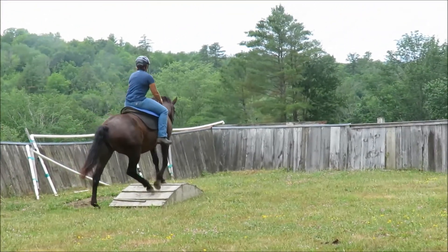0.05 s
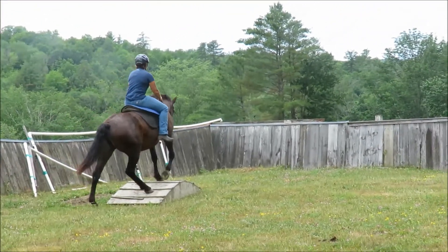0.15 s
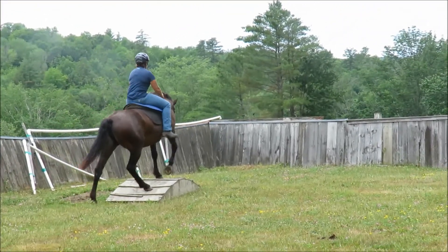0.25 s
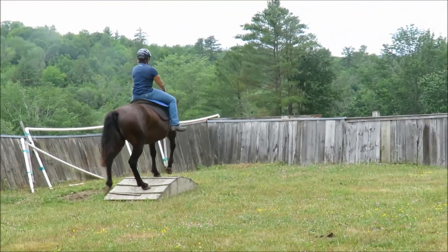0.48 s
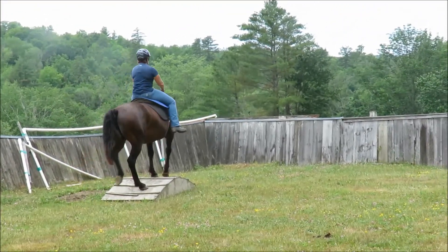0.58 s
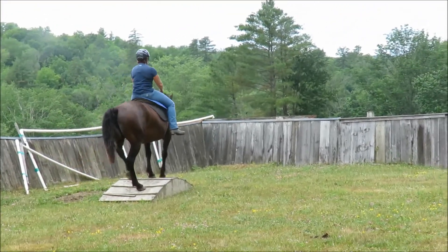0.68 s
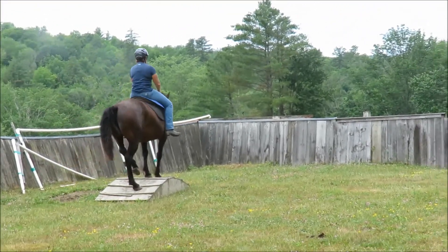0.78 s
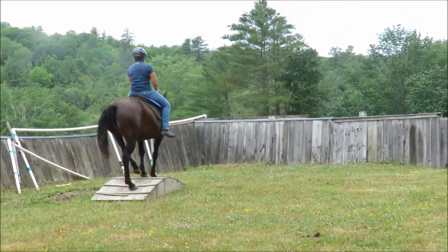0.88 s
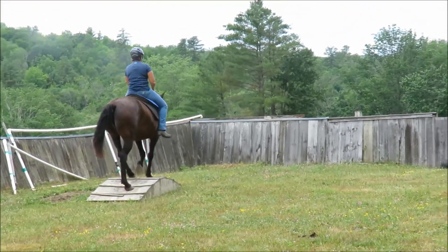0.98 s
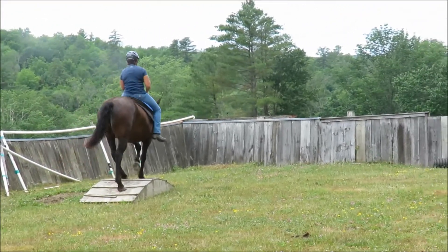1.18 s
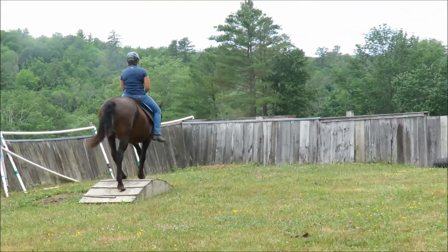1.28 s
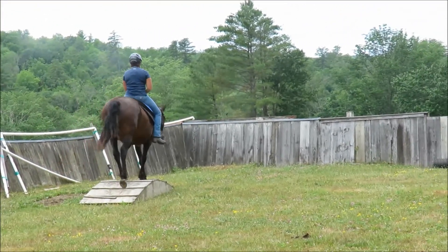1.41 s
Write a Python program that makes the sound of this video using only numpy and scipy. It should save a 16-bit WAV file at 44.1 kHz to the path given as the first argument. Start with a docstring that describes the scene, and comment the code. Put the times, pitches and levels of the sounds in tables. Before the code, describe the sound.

Hollow clops of a horse stepping onto wooden planks outdoors, with a faint distant bird.

```python
"""Horse on a wooden platform

In a paddock, some metres from the microphone, a horse steps onto a hollow wooden platform.
Each hoof lands toe first, then heel: the box booms, the hoof clops and the planks chatter; knocks and
scuffs follow as its weight shifts. Fence and trees echo faintly over a light breeze and a far bird."""
import sys
import numpy as np
from scipy import signal
from scipy.fft import rfft, irfft
from scipy.io import wavfile
from scipy.ndimage import uniform_filter1d

SR = 44100
rng = np.random.default_rng(int(sys.argv[2]) if len(sys.argv) > 2 else 0)


def generate_wav(signal):
    """Clip the signal to [-1, 1] and save it as 16-bit WAV at the path in sys.argv[1]."""
    frames = np.transpose(np.atleast_2d(signal))
    scaled = np.clip(frames, -1, 1) * 32767
    pcm = np.round(scaled).astype(np.int16)
    wavfile.write(sys.argv[1], SR, pcm)


N = 63945

# modes of the hollow platform (frequency [Hz], level on the ramp [dB], level on top [dB], t60 [s])
PLATFORM_MODES = [(60.3, -26.5, -21, 0.3), (145.2, -10.5, -9, 0.12), (174, -25.5, -7.5, 0.22),
                  (204.7, -2, -12, 0.23), (253.3, 5.5, -12.5, 0.087), (287.3, -6.5, -5, .19),
                  (333.7, -2.5, -12.5, 0.19), (364.3, -1, -1.5, 0.11), (440.7, -7, -7.5, 0.15),
                  (496, -17.5, -2, 0.17), (562.2, -12.5, -4.5, 0.18), (704, -20, -3, 0.09),
                  (746, -33, -4.5, .12)]


def undb(db):
    """Decibels to gain."""
    return 10 ** (np.asarray(db) / 20)


def unit(x):
    """Scale to an rms of 1."""
    return x / np.sqrt(np.mean(x ** 2) + 1e-20)


def clock():
    """Time in seconds."""
    return np.arange(N) / SR


def fade(t60):
    """Exponential decay, 60 dB down after t60 seconds."""
    return np.exp(-np.log(1000) * clock() / t60)


def arch(start, length):
    """Half a sine, silent before and after."""
    return np.sin(np.pi * np.clip((clock() - start) / length, 0, 1))


def gains(colour, size):
    """Gain of each frequency bin from (Hz, dB) points."""
    hz, db = np.array(colour).T
    return undb(np.interp(np.log(np.fft.rfftfreq(size, 1 / SR) + 1), np.log(hz), db))


def noise(colour):
    """Coloured noise of rms 1."""
    return unit(irfft(rfft(rng.standard_normal(N)) * gains(colour, N), N))


def snap(colour):
    """Shortest causal pulse with the given colour, peak 1."""
    cepstrum = irfft(np.log(gains(colour, 2 * N)))[:N]
    cepstrum[0] /= 2
    pulse = irfft(np.exp(rfft(2 * cepstrum, 2 * N)))[:N]
    return pulse / np.abs(pulse).max()


def conv(x, response):
    """Pass x through a response."""
    return signal.fftconvolve(x, response)[:N]


def scatter(x, tail):
    """Smear x over a tail of reflections scaled to unit energy."""
    return conv(x, tail / np.sqrt(np.sum(tail ** 2)))


def at(start, x):
    """Delay a sound by start seconds."""
    return np.concatenate([np.zeros(int(start * SR)), x])[:N]


def drift(rate_hz):
    """Smooth random drift of rms 1."""
    hold = int(SR / rate_hz)
    steps = np.repeat(rng.standard_normal(N // hold + 1), hold)
    return unit(uniform_filter1d(uniform_filter1d(steps, hold), hold)[:N])


def breeze(level_db=-49, swell_db=1.1, flicker_db=0.8):
    """Soft paddock air whose octaves swell together and flicker alone, with faint distant drones."""
    # colour of the air (frequency [Hz], level [dB])
    colour = [(20, -13), (65, 1), (130, -2), (300, 0.5), (500, -2), (800, -2), (1300, -3.5), (1550, -10),
              (2500, -17), (3700, -15.5), (5000, -21), (7000, -29.5), (10000, -36.5), (12000, -42.5),
              (14000, -56)]
    # lift of the hiss around 2 kHz (time [s], level [dB])
    treble = [(0, 7.5), (.3, 5.5), (0.551, 1), (.8, -2), (1.2, -2), (1.45, 3.5)]
    # steady narrow bands far off (frequency [Hz], half-width [Hz], level [dB])
    drones = [(993, 38, -55), (8190, 65, -84.5)]
    freqs = np.fft.rfftfreq(N, 1 / SR) + 1
    spectrum, swell, out = rfft(noise(colour)), drift(6.6), 0
    for octave in range(4, 15):
        band = irfft(spectrum * np.clip(1 - np.abs(np.log2(freqs) - octave), 0, 1), N)
        treble_db = np.interp(clock(), *np.array(treble).T) if 2 ** octave == 2048 else 0
        out += band * undb(level_db + treble_db + swell_db * swell + flicker_db * drift(19.35))
    for hz, half_width, db in drones:
        peak = 1 / (1 + ((freqs - hz) / half_width) ** 2)
        out += undb(db) * unit(irfft(rfft(rng.standard_normal(N)) * peak, N))
    return out


def swish():
    """A faint, high breath of noise just before the first step."""
    # colour of the swish (frequency [Hz], level [dB])
    colour = [(4000, -30), (8000, 0), (10500, -1), (14000, -10)]
    return undb(-66.5) * noise(colour) * arch(start=0.067, length=0.027)


def bird(waver=0.012, rasp_hz=700, scatter_db=-5.5):
    """A far bird twitters in short gliding notes, some pure, some raspy, scattered by the trees."""
    # notes (time [s], length [s], first [Hz], middle [Hz], last [Hz], level [dB], rasp [0-1])
    notes = [(0.113, 0.057, 3343, 3465, 3350, -52, 0.9), (0.736, 0.018, 3020, 2770, 2670, -55.5, 0.34),
             (0.773, 0.017, 3370, 3600, 3870, -55.5, 0.2), (0.822, 0.014, 3710, 3570, 3170, -54, .6),
             (0.838, 0.018, 3030, 2920, 2600, -55, .1), (0.877, 0.048, 2600, 2936, 2590, -51.5, 0.1),
             (0.909, 0.01, 4050, 3670, 3200, -52.5, .2), (0.933, 0.044, 2996, 3330, 2730, -52.5, 0.3),
             (0.971, 0.0237, 3740, 3400, 2860, -57, 0.72), (1.018, 0.026, 3000, 2900, 2700, -57.5, .4),
             (1.053, 0.024, 4355, 3650, 2900, -47, 0.4), (1.082, 0.0298, 3150, 3650, 3790, -45, .8)]
    song = 0
    for start, length, first, middle, last, db, rasp in notes:
        progress = np.clip((clock() - start) / length, 0, 1)
        glide_hz = np.polyval(np.polyfit([0, 0.5, 1], [first, middle, last], 2), progress)
        phase = 2 * np.pi * np.cumsum(glide_hz * (1 + waver * drift(900))) / SR
        voice = np.sqrt(1 - rasp) + np.sqrt(rasp / 2) * (drift(rasp_hz) + 1j * drift(rasp_hz))
        song += undb(db) * np.sqrt(arch(start, length)) * np.imag(voice * np.exp(1j * phase))
    leaves = rng.standard_normal(N) * fade(0.25)
    return undb(-1) * (song + undb(scatter_db) * scatter(song, leaves))


def ring(modes, place, tuning=1, wobble=0.011):
    """Wood rings by where it is struck (0 ramp, 1 top); loose joints unsettle the pitch."""
    looseness, out = wobble * (1 - fade(0.19)), 0
    for hz, ramp_db, top_db, t60 in modes:
        gain = undb(ramp_db + place * (top_db - ramp_db))
        unsteady_time = clock() + np.cumsum(looseness * drift(70)) / SR
        out += gain * fade(t60) * np.cos(2 * np.pi * hz * tuning * unsteady_time)
    return out


def push(ms):
    """Force of a contact: the longer, the duller."""
    progress = clock() * 1000 / (ms / 4)
    force = progress * np.exp(-progress)
    return force / force.sum()


def chatter(split_hz=1100, rise_s=0.001):
    """Struck planks rattle, the lows outlasting the highs."""
    # colour of the rattle (frequency [Hz], level [dB])
    colour = [(40, -28.5), (110, -25), (200, -2.5), (400, -1.5), (750, 2), (1250, 3), (1700, -8.5),
              (3000, -13.5), (5000, -28.5), (8000, -41.5), (14000, -63)]
    rattle = noise(colour)
    low = signal.sosfiltfilt(signal.butter(2, split_hz, fs=SR, output="sos"), rattle)
    return (low * fade(0.23) + (rattle - low) * fade(0.17)) * (1 - np.exp(-clock() / rise_s))


def hooves(grit=0.42, edge_share=0.36, clop_share=0.54):
    """Each contact cracks, clops, booms and chatters; the hard edge bites faster than the whole hoof."""
    # hoof contacts (time [s], boom [dB], clop [dB], crack [dB], chatter [dB], push length [ms],
    # place [0 ramp, 1 top], plank pitch [ratio])
    contacts = [(0.2124, -17.5, -13, -13, -31.5, 0.64, 0, 0.98),
                (.2261, -16.5, -12, -18.5, -28.5, 0.91, 0, 0.99), (.2325, -20.5, -26, -26, -41, 2.44, 0, 1),
                (1.1043, -28.5, -15.5, -23, -31.5, 0.85, 0.89, 1),
                (1.1094, -26, -19.5, -28, -36, 0.95, 0.55, 1),
                (1.1206, -22.5, -32, -20, -36, 1.37, 0.47, 0.63),
                (1.1362, -39, -20, -29, -48.5, 1.32, 0.79, 1.05)]
    # modes of the plank underfoot (frequency [Hz], level on the ramp [dB], level on top [dB], t60 [s])
    plank_modes = [(740, -19, -27, 0.035), (910, -13.5, -19, 0.027), (1060, -24, -28, 0.04),
                   (1152, -2.5, -36, 0.072), (1218.6, -7, 3, 0.07), (1314, -20, -7, 0.1),
                   (1332, -41.5, -3.5, 0.1), (1616, -7.5, -26.5, 0.036), (1915, -15.5, 3, 0.027),
                   (2192, -11, 2, 0.037), (2700, -28, 12.5, 0.035), (2910, 8, 8, 0.018),
                   (3815, 4, -6, 0.018), (4580, -3, -23.5, 0.027), (6700, -2, -23, 0.02),
                   (7800, -24.5, 22, .011)]
    # colour of the crack (frequency [Hz], level [dB])
    colour = [(40, -45), (85, -19), (140, -2), (300, 3.5), (700, -1.5), (1300, -5), (2100, -4), (2450, -15),
              (2900, -23), (3300, -13.5), (4200, -16.5), (5500, -33.5), (8000, -26.5), (14000, -51)]
    out = 0
    for start, boom_db, clop_db, crack_db, chatter_db, ms, place, tuning in contacts:
        crack = 2 * undb(crack_db) * (snap(colour) + grit * noise(colour) * fade(0.025))
        clop = undb(clop_db) * conv(ring(plank_modes, place, tuning), push(ms * clop_share))
        boom = undb(boom_db) * conv(ring(PLATFORM_MODES, place), push(ms))
        blow = conv(crack + clop + boom, push(ms * edge_share))
        out += at(start, blow + undb(chatter_db) * chatter())
    return out


def knocks(grit=0.32):
    """Planks knock dully under the shifting weight."""
    # light knocks (time [s], thud [dB], ring [dB], push length [ms])
    blows = [(0.248, -45, -21.5, 2.1), (0.2609, -25, -22, 1.35), (0.2813, -37, -39.5, 0.2),
             (0.307, -29, -46, 4.3), (.404, -65, -47.5, 1.06), (0.534, -29, -57, 5.6),
             (0.557, -21, -57, 7.9), (0.7995, -32, -43, 0.97), (0.831, -64, -43.5, 1.8),
             (0.8825, -62, -39, 1.7), (0.9596, -27.5, -51, 3.1), (1.149, -31, -31, 2.9),
             (1.345, -78, -43.5, 1.8)]
    # colour of the thud (frequency [Hz], level [dB])
    colour = [(25, -68.5), (60, -13), (120, 6.5), (300, -8), (600, -22), (1200, 0.5), (2500, -24.5),
              (9000, -52)]
    platform, out = ring(PLATFORM_MODES, place=0.37), 0
    for start, thud_db, ring_db, ms in blows:
        thud = 2 * snap(colour) + grit * noise(colour) * fade(0.018)
        out += at(start, conv(undb(thud_db) * thud + undb(ring_db) * platform, push(ms)))
    return out


def scuffs(judder_hz=128.3, uneven=0.081):
    """A hoof sticks and slips along a plank: an uneven train of tiny pushes into the wood."""
    # slides of the hoof (time [s], length [s], level [dB])
    slides = [(0.491, 0.039, -57), (0.888, 0.048, -45), (1.329, 0.041, -51.5)]
    # colour of one slip (frequency [Hz], level [dB])
    colour = [(70, -24), (170, 0.5), (260, 5.5), (350, 3.5), (450, -18), (1200, -24), (3000, -45),
              (12000, -85)]
    cycles = np.cumsum(judder_hz * (1 + uneven * drift(150))) / SR
    slips = np.diff(np.floor(cycles), prepend=0)
    judder = unit(conv(slips, snap(colour)))
    return judder * sum(undb(db) * np.sqrt(arch(start, length)) for start, length, db in slides)


def tick(start=1.2679, grit=0.11):
    """One small bright tick, perhaps a buckle."""
    # colour of the tick (frequency [Hz], level [dB])
    colour = [(300, -20), (1700, -7.5), (3500, -3), (5000, 1.5), (6000, -9), (7200, -20), (14000, -45)]
    click = snap(colour) + grit * noise(colour) * fade(0.008)
    return at(start, undb(-28.5) * click)


def bend(x, travel_ms_at_1khz=0.926):
    """Bending waves in the planks speed up with the root of frequency, so the lows arrive later."""
    khz = np.fft.rfftfreq(2 * N, 1 / SR) / 1000
    lag = 4 * np.pi * travel_ms_at_1khz * np.sqrt(khz)
    return irfft(rfft(x, 2 * N) * np.exp(-1j * lag))[:N]


def paddock(x, echo_db=-18, rise_s=0.026):
    """The direct sound plus a scattered echo from fence and trees."""
    # colour of the echo (frequency [Hz], level [dB])
    colour = [(50, -24), (130, 4), (300, -4.5), (700, 2), (1300, -2), (3000, -3.5), (9000, 2.5)]
    tail = noise(colour) * fade(t60=1) * (1 - np.exp(-clock() / rise_s))
    return x + undb(echo_db) * scatter(x, tail)


def scene():
    """Horse and bird are straight ahead; only hiss and a trace of scatter differ from left to right."""
    # colour of the hiss from the sides (frequency [Hz], level [dB])
    side_hiss = [(40, -36), (300, -3), (900, 3.5), (2500, -2), (4500, -5.5), (7000, -8), (10000, -16.5),
                 (12000, -19), (14000, -29.5)]
    horse = paddock(bend(hooves() + knocks() + scuffs()))
    mid = horse + bird() + tick() + swish() + breeze()
    bright_tail = noise([(100, -22), (400, -23.5), (1200, 8.5), (4000, 31)]) * fade(0.02)
    side = undb(-59.5) * noise(side_hiss) + undb(-21) * scatter(horse, bright_tail)
    return np.array([mid + side, mid - side])


def record(dry, low_hz=60, top_hz=14000):
    """The microphone cuts the deepest bass and the top."""
    thinned = signal.sosfilt(signal.butter(3, low_hz, "high", fs=SR, output="sos"), dry)
    return signal.sosfilt(signal.ellip(8, 0.2, 70, top_hz, fs=SR, output="sos"), thinned)


dry = scene()
out = record(dry)
generate_wav(out)
```